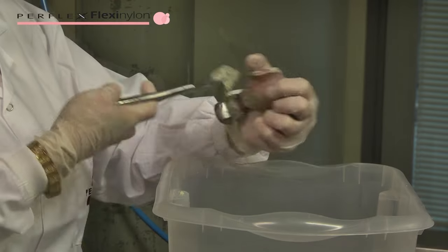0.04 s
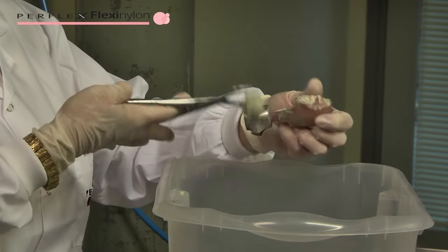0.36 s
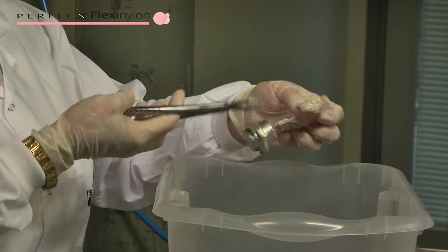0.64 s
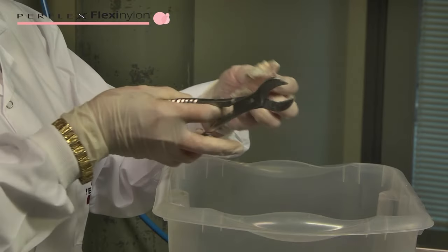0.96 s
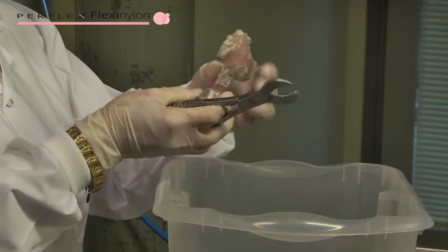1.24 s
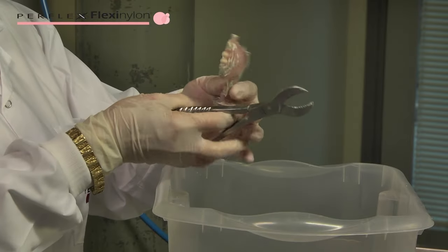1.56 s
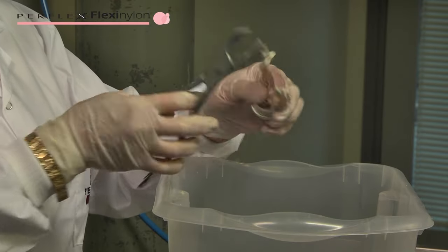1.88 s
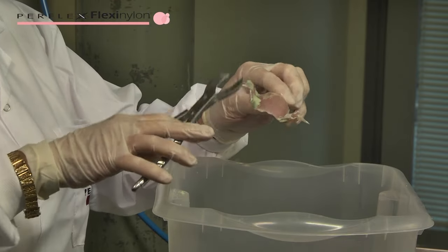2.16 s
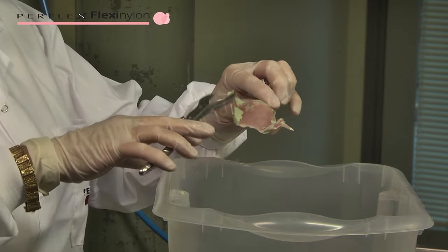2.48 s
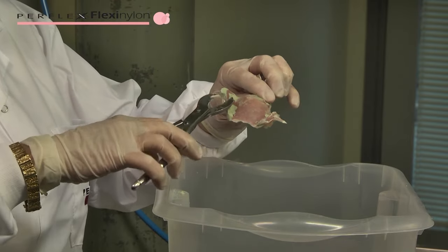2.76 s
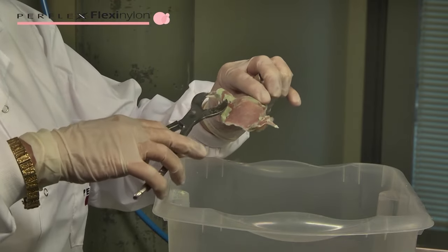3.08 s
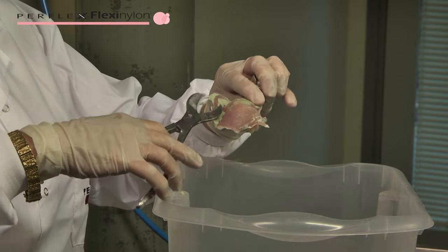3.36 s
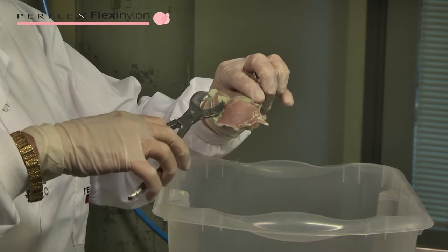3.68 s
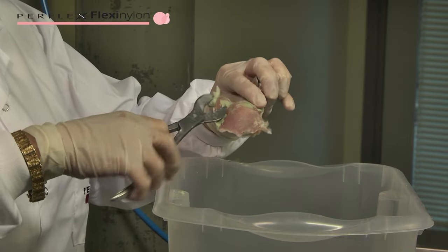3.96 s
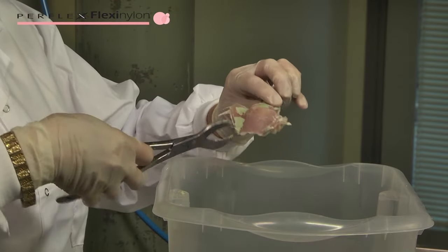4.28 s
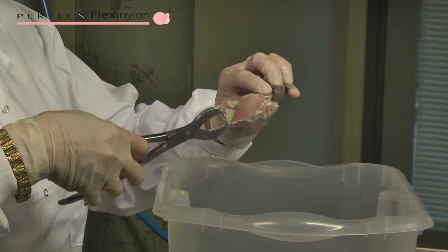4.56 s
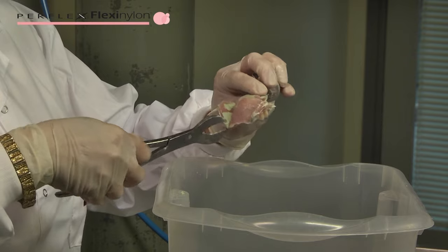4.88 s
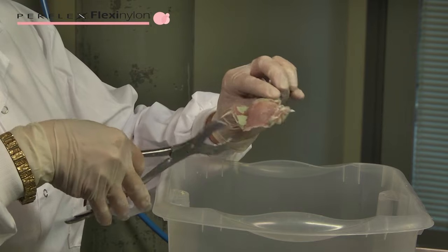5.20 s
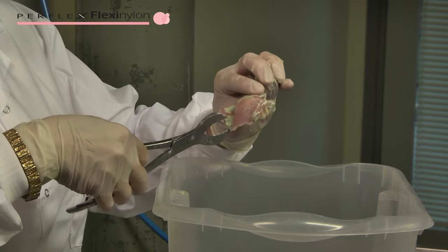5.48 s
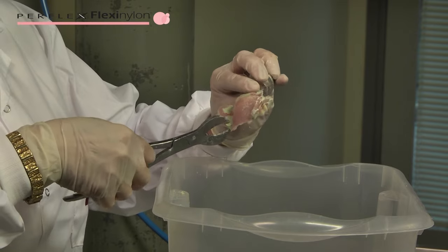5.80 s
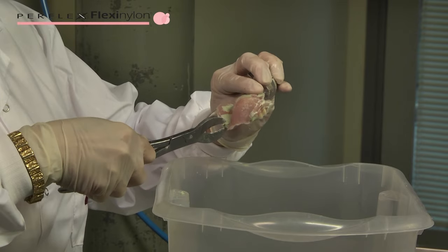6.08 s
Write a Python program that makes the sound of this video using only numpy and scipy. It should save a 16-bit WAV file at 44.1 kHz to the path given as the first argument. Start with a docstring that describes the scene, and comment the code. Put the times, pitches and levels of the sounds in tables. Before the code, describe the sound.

Steel nippers crack hard plaster, and broken pieces clatter into a plastic tub over a low ventilation hum.

```python
"""A small workroom, one microphone near a plastic tub over which steel nippers trim a plaster casting.
Each bite is a quiet, bright crack of tiny fractures, and now and then the jaws clink and ring.
Freed pieces fall, strike the tub and bounce: its floor booms, its walls rattle, the room answers.
Gloves rustle faintly on the casting; behind it all, ventilation rumbles and a motor hums."""
import sys
import numpy as np
from scipy import signal
from scipy.fft import rfft, irfft
from scipy.io import wavfile
from scipy.ndimage import uniform_filter1d

SR = 44100
rng = np.random.default_rng(int(sys.argv[2]) if len(sys.argv) > 2 else 0)


def transcribe(signal):
    """Save signal, clipped to [-1, 1], as a 16-bit WAV file at the path in sys.argv[1]."""
    frames = np.atleast_2d(signal).T
    limited = np.clip(frames, -1, 1)
    pcm = np.round(limited * 32767).astype(np.int16)
    wavfile.write(sys.argv[1], SR, pcm)


N = 279549
HZ = np.fft.rfftfreq(N, 1 / SR)
T = np.arange(2 ** 15) / SR  # time axis of one ring or room tail

# plaster snapping: start_s, level_db, centre_hz, spread_octaves, grit_db
SNAPS = [(0.5922, -7, 2470, 0.19, -28), (1.32, -49, 2530, 0.46, -70), (3.2565, -35, 2850, 0.23, -39),
         (3.6004, -46, 4630, .1, -70), (4.1072, -36.5, 2550, 0.16, -42), (4.518, -28.5, 2750, 0.21, -55),
         (5.26, -33, 1750, 0.94, -43), (5.2609, -27.5, 3220, 0.15, -61), (5.409, -10.5, 1880, 0.32, -15),
         (6.0004, -19.5, 1800, 0.75, -44), (6.0006, -27, 4670, 0.14, -50)]
# jaws grinding into plaster: start_s, level_db, centre_hz, decay_s
CRUNCHES = [(0.3526, -37.5, 2620, .0044), (1.168, -60, 4770, .01), (4.451, -32.5, 2160, .0095),
            (5.0847, -33, 1990, 0.01), (5.9807, -32, 3880, 0.018)]
# how well a crack radiates: frequency_hz, gain_db
CRACK_RADIATION = [(100, 2), (500, 14.5), (9000, -5), (15000, -10)]
# jaws knocking and slipping: start_s, scratch_db, centre_hz, ring_db
CLINKS = [(0.086, -40.5, 7500, -88), (1.905, -53, 8000, -90), (3.2456, -31, 4800, -72),
          (3.9934, -34.5, 4500, -64), (4, -31.5, 8500, -76), (4.021, -37.5, 4800, -79),
          (4.4612, -31.5, 13000, -69), (5.1648, -41, 8000, -73), (5.176, -38.5, 8500, -68.5)]
# modes of the nippers: pitch_hz, level_db, t60_s
STEEL_MODES = [(1760, 4, .045), (2624, 4, 0.045), (4050, -8, .12), (4850, -3, 0.065), (6380, 1, 0.14),
               (6840, 5, .04), (10700, 6, 0.042), (11000, 1, .06), (11700, -7, .04)]
# pieces landing in the tub: start_s, clatter_db, hardness_hz, boom_db, corner_to_face_s, flight_s
PIECES = [(0.5912, -4.5, 2780, -13, .0104, .065), (4.4622, -21.5, 1850, -39.5, .0052, .0104),
          (4.515, -23, 3300, -50, .0051, .031), (5.414, -9, 4740, -35, 0.0071, .013)]
# showers of crumbs: start_s, level_db, decay_s
CRUMBS = [(0.622, -11.5, 0.053), (0.688, -14, 0.028), (0.88, -36.5, 0.0079), (4.634, -35, .047)]
# modes of the tub floor: pitch_hz, level_db, t60_s
FLOOR_MODES = [(223, -25.5, 0.29), (273, -18.5, 0.15), (321, -16, 0.065), (369.6, -4.5, 0.058),
               (394.8, 1.5, 0.074), (352, -36, 0.28), (414, -8, 0.051), (483.7, -7, 0.087),
               (482, -33, 0.33), (550, -16, 0.13), (657, -26.5, 0.14), (761, -16.5, 0.052),
               (796, -10, 0.056), (941, -24, 0.12), (1197, -22, .15), (1890, -24, 0.033),
               (2270, -28, 0.016), (2760, -10, 0.019)]
# dense resonances of the tub walls: frequency_hz, gain_db
WALL_SPECTRUM = [(30, -45), (90, -23), (170, 0), (400, 5), (520, 3.5), (660, 1), (820, -3.5), (1150, 5),
                 (1500, -1.5), (1900, -3), (2900, -2.5), (3700, -13), (5500, -10.5), (8000, -17.5),
                 (11000, -16.5), (15000, -25)]
# modes of the hand-held casting: pitch_hz, level_db, t60_s
CASTING_MODES = [(137.5, -47, 0.34), (197, -38, 0.066)]
# shifts of grip: start_s, length_s, level_db
RUSTLES = [(0, 0.68, -76.5), (4.13, 0.39, -76), (4.7, .42, -79)]
# colour of rubbing gloves: frequency_hz, gain_db
GLOVE_SPECTRUM = [(300, -6), (900, 2), (3000, -1), (6000, -7), (10000, -11.5), (15000, -17)]
# reverberation of the workroom: frequency_hz, t60_s
ROOM_DECAY = [(100, 1), (250, 0.71), (400, 0.51), (1000, 0.27), (3000, 0.34), (6000, .41), (10000, 0.35),
              (15000, 0.2)]
# colour of the ventilation: frequency_hz, gain_db
AIR_SPECTRUM = [(20, -10), (40, -8), (75, -1.5), (125, -0.5), (165, 2), (250, -3), (370, -7.5), (570, -11),
                (800, -14), (1500, -19.5), (2800, -26), (4000, -31.5), (8000, -34.5), (15000, -37.5)]
# motor tones: pitch_hz, level_db
MOTOR_TONES = [(49.2, -72.5), (100.1, -59.5), (199.7, -70.5), (279, -77.5)]
# noise band under the motor tones: centre_hz, half_width_hz, level_db
MOTOR_DRONE = (94.5, 8, -66)


def snaps(snap_s=0.0029, grit_s=0.02, grit_pitch_ratio=2.8, grit_octaves=0.42):
    """The plaster splits at once and throws off a brighter, longer spray of grit."""
    out = np.zeros(N)
    for start_s, level_db, centre_hz, octaves, grit_db in SNAPS:
        split = in_room(crack(centre_hz, octaves, snap_s), room_db=-8)
        grit = in_room(crack(grit_pitch_ratio * centre_hz, grit_octaves, grit_s), room_db=-6)
        add(out, start_s, amp(level_db) * split + amp(grit_db) * grit)
    return out


def crack(centre_hz, octaves, decay_s):
    """Tiny fractures spray a hump of noise with steep skirts; so small a source radiates little bass."""
    def colour_db(hz):
        away = np.log2((hz + 1) / centre_hz) / octaves
        return curve(CRACK_RADIATION, hz) - 20 * np.log10(1 + away ** 2 / 2 + (away / 3.05) ** 8)
    return burst(colour_db, decay_s)


def crunches(octaves=1):
    """The plaster crumbles under the pressure of the jaws."""
    out = np.zeros(N)
    for start_s, level_db, centre_hz, decay_s in CRUNCHES:
        add(out, start_s, amp(level_db) * in_room(crack(centre_hz, octaves, decay_s), room_db=3))
    return out


def clinks():
    """Steel scratches brightly on plaster and the jaws ring, differently each time."""
    out = np.zeros(N)
    for start_s, scratch_db, centre_hz, ring_db in CLINKS:
        scratch = amp(scratch_db) * crack(centre_hz, octaves=0.91, decay_s=0.0078)
        jaws = amp(ring_db) * ring(STEEL_MODES, scatter_db=1.5)
        add(out, start_s, in_room(scratch + jaws, room_db=-1))
    return out


def falling_pieces(rise_s=0.0016, contact_s=0.0037, face_db=-5, echo_s=0.0757, echo_db=-7.5):
    """Each piece lands on a corner, tips onto its face and hops twice; walls rattle, the floor booms."""
    rattle_step_db, boom_step_db = -12, -12.5  # per bounce
    rattle_room_db, boom_room_db = 1, -5
    out = np.zeros(N)
    floor = band(ring(FLOOR_MODES), low_hz=261, high_hz=5000)  # an open tub radiates no deep bass
    floor *= 1 - np.exp(-T / rise_s)
    for start_s, clatter_db, hardness_hz, boom_db, tip_s, flight_s in PIECES:
        thud = floor.copy()
        add(thud, tip_s, amp(face_db) * floor)
        echo = band(thud, low_hz=243, high_hz=594)  # the boom comes back once from across the room
        add(out, start_s + echo_s, amp(boom_db + echo_db) * echo)
        for bounce in range(3):
            landing_s = start_s + bounce * flight_s
            rattle = clatter(hardness_hz, contact_s)
            add(rattle, tip_s, amp(face_db) * clatter(hardness_hz, contact_s))
            rattle *= amp(clatter_db + rattle_step_db * bounce)
            boom = amp(boom_db + boom_step_db * bounce) * thud
            add(out, landing_s, rattle + boom)
            add(out, landing_s, reflections(amp(rattle_room_db) * rattle + amp(boom_room_db) * boom))
    return out


def clatter(hardness_hz, decay_s, steep_ratio=2.86, bass_ratio=24):
    """A contact rattles the tub walls; a smaller, harder piece sounds brighter and has less bass."""
    def colour_db(hz):
        # a contact takes time, so its force fades above hardness_hz: gently, then steeply
        gentle = 1 + (hz / hardness_hz) ** 2
        steep = 1 + (hz / (steep_ratio * hardness_hz)) ** 6
        bass_loss_db = 20 * np.log10(1 + (hardness_hz / bass_ratio / (hz + 1)) ** 4)
        return curve(WALL_SPECTRUM, hz) - 10 * np.log10(gentle * steep) - bass_loss_db
    return burst(colour_db, decay_s)


def crumbs(hardness_hz=3530):
    """Crumbs skitter over the plastic, too light to make it boom."""
    out = np.zeros(N)
    for start_s, level_db, decay_s in CRUMBS:
        add(out, start_s, amp(level_db) * in_room(clatter(hardness_hz, decay_s), room_db=1))
    return out


def casting_jolt(start_s=6.0073, knock_db=-22):
    """The jaws slip: a dull knock, and the casting thuds, damped by the gloved hand."""
    out = np.zeros(N)
    knock = crack(centre_hz=495, octaves=0.33, decay_s=0.0073)
    add(out, start_s, amp(knock_db) * in_room(knock, room_db=-6))
    add(out, start_s, ring(CASTING_MODES))
    return out


def gloves(grain_db=4, fade_s=0.05):
    """Rubber gloves rub with a faint, grainy hiss as the hands shift their grip."""
    noise = rng.standard_normal(N)
    roughness = unit(uniform_filter1d(rng.standard_normal(N), size=400))
    hiss = coloured(noise * amp(grain_db * roughness), amp(curve(GLOVE_SPECTRUM, HZ)))
    envelope = np.zeros(N)
    for start_s, length_s, level_db in RUSTLES:
        t = np.arange(0, length_s, 1 / SR)
        fade = np.minimum(np.minimum(t, length_s - t) / fade_s, 1)
        add(envelope, start_s, amp(level_db) * fade)
    return envelope * hiss


def reflections(sound, gap_s=0.0026, build_s=0.001):
    """The room answers after a gap, each band dying at its own rate; each position has its own tail."""
    hz, t, spectra = signal.stft(rng.standard_normal(len(T)), SR, nperseg=256)
    decay = amp(-60 * t / curve(ROOM_DECAY, hz)[:, None])
    tail = signal.istft(spectra * decay, SR, nperseg=256)[1][:len(T)]
    build_up = 1 - np.exp(-np.maximum(T - gap_s, 0) / build_s)
    spectrum = rfft(tail * build_up)
    spectrum /= np.sqrt(uniform_filter1d(abs(spectrum) ** 2, size=30))  # equal energy in every band
    tail = irfft(spectrum) * (T > gap_s)
    return signal.fftconvolve(sound, tail[:-4096])


def in_room(sound, room_db):
    """The direct sound reaches the microphone first, then its reflections."""
    heard = amp(room_db) * reflections(sound)
    add(heard, 0, sound)
    return heard


def ventilation(level_db=-61.5):
    """Moving air rumbles and faintly hisses."""
    return amp(level_db) * coloured(rng.standard_normal(N), amp(curve(AIR_SPECTRUM, HZ)))


def motor_hum():
    """A mains motor holds steady tones, over a narrow drone that makes the hum waver."""
    t = np.arange(N) / SR
    tones = sum(amp(db) * np.sqrt(2) * np.sin(2 * np.pi * (hz * t + rng.random()))
                for hz, db in MOTOR_TONES)
    centre_hz, half_width_hz, drone_db = MOTOR_DRONE
    resonance = 1 / (1 + ((HZ - centre_hz) / half_width_hz) ** 2)
    return tones + amp(drone_db) * coloured(rng.standard_normal(N), resonance)


def burst(colour_db, decay_s, size=8192, onset_s=0.0001):
    """A dying spray of micro-contacts, causally filtered by colour_db(hz) and scaled to energy 1."""
    t, hz = T[:size], np.fft.rfftfreq(size, 1 / SR)
    contacts = rng.standard_normal(size) * np.sqrt(rng.exponential(1, size))
    envelope = np.exp(-t / decay_s) * (1 - np.exp(-t / onset_s))  # a fracture takes a moment to spread
    spectrum = rfft(contacts * envelope)
    spectrum /= np.sqrt(uniform_filter1d(abs(spectrum) ** 2, size=160) + 1e-12)  # level the bands
    spray = irfft(spectrum)[:size // 2]
    log_gain = np.log(amp(np.maximum(colour_db(hz), -70)))
    mirrored = np.r_[log_gain, log_gain[-2:0:-1]]
    minimum_phase = np.exp(np.conj(signal.hilbert(mirrored)))[:len(hz)]
    sound = signal.fftconvolve(spray, irfft(minimum_phase)[:size // 2])
    return np.pad(sound, (0, len(T) - len(sound))) / np.linalg.norm(sound)


def ring(modes, scatter_db=0):
    """Decaying sines after one blow; where the blow lands scatters their strengths."""
    return sum(amp(db + scatter_db * rng.standard_normal() - 60 * T / t60_s) * np.sin(2 * np.pi * hz * T)
               for hz, db, t60_s in modes)


def band(sound, low_hz, high_hz):
    """Causal band-pass."""
    return signal.sosfilt(signal.butter(2, [low_hz, high_hz], "band", fs=SR, output="sos"), sound)


def coloured(noise, gain):
    """Noise shaped by a gain per frequency, at an rms of 1."""
    return unit(irfft(rfft(noise) * gain, N))


def curve(points, hz):
    """Joins (frequency_hz, value) points on a log-frequency axis."""
    points_hz, values = np.transpose(points)
    return np.interp(np.log(hz + 1), np.log(points_hz + 1), values)


def amp(db):
    """Decibels to amplitude."""
    return 10 ** (np.asarray(db) / 20)


def unit(x):
    """Scales to an rms of 1."""
    return x / np.sqrt(np.mean(abs(x) ** 2) + 1e-20)


def add(mix, start_s, sound):
    """Mixes a sound in from start_s on."""
    part = mix[round(start_s * SR):][:len(sound)]
    part += sound[:len(part)]


def scene():
    """Tub, nippers, hands and workroom at one microphone."""
    tub = falling_pieces() + crumbs()
    nippers = snaps() + crunches() + clinks()
    hands = casting_jolt() + gloves()
    return (tub + nippers + hands + ventilation() + motor_hum())[None]


def record(dry, cutoff_hz=15500):
    """The recorder cuts off the highest treble."""
    low_pass = signal.firwin(255, cutoff_hz, window=("kaiser", 8), fs=SR)
    return signal.oaconvolve(dry, low_pass[None], "same")


dry = scene()
out = record(dry)
transcribe(out)
```